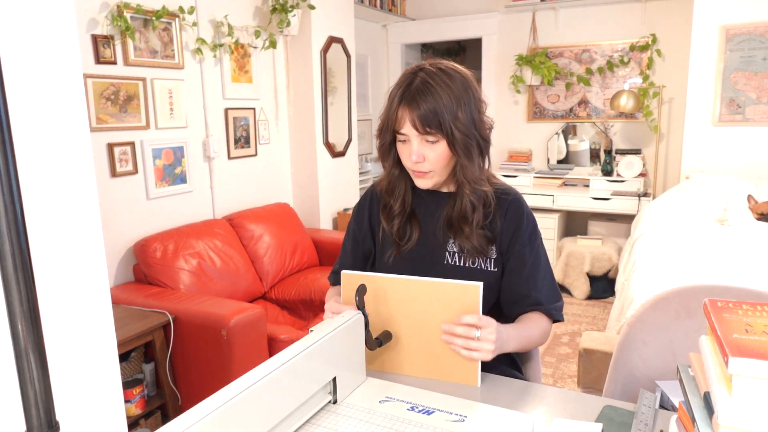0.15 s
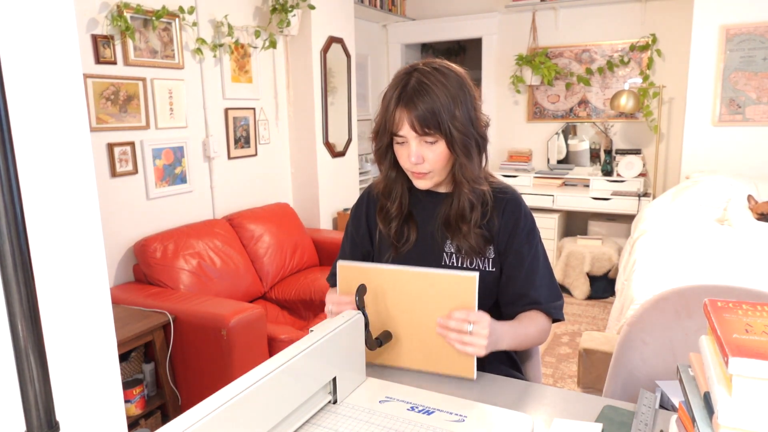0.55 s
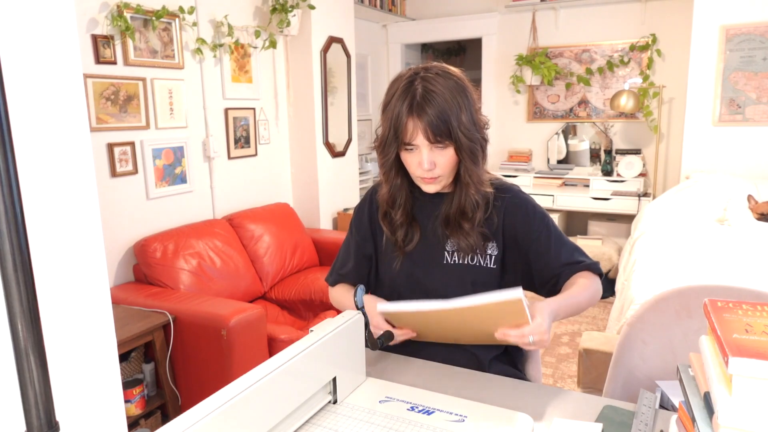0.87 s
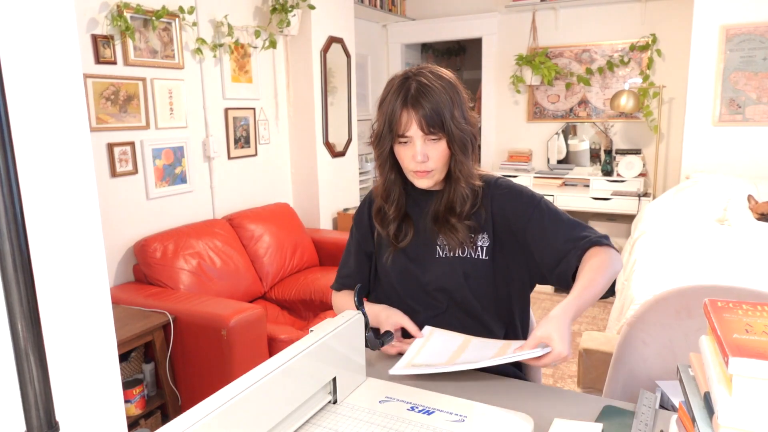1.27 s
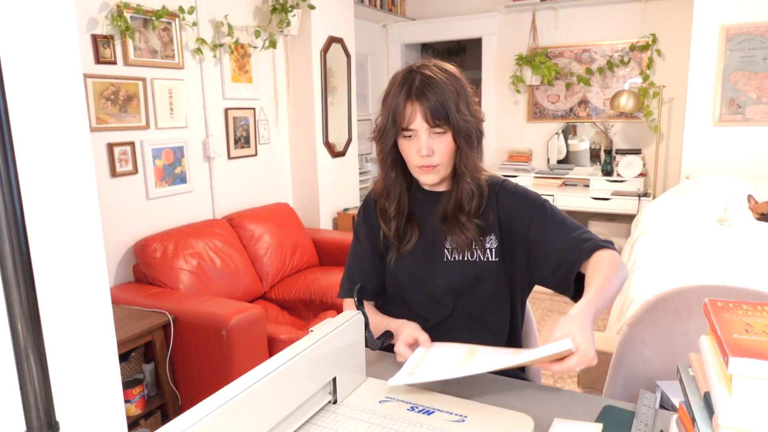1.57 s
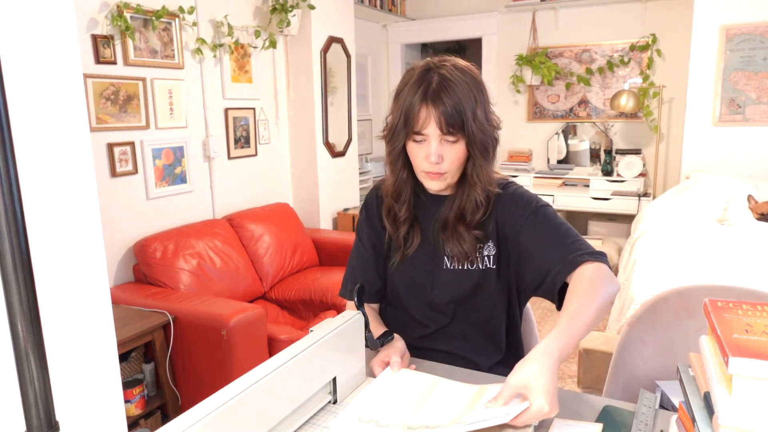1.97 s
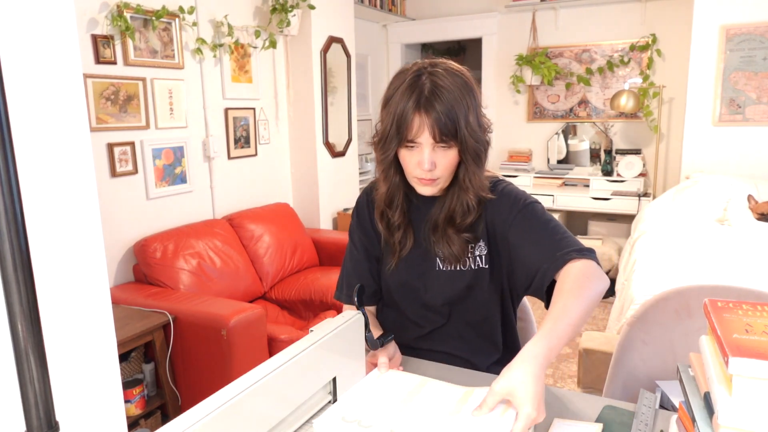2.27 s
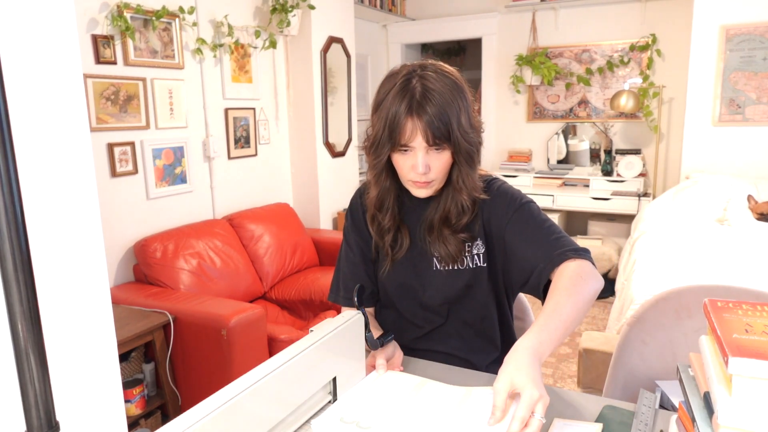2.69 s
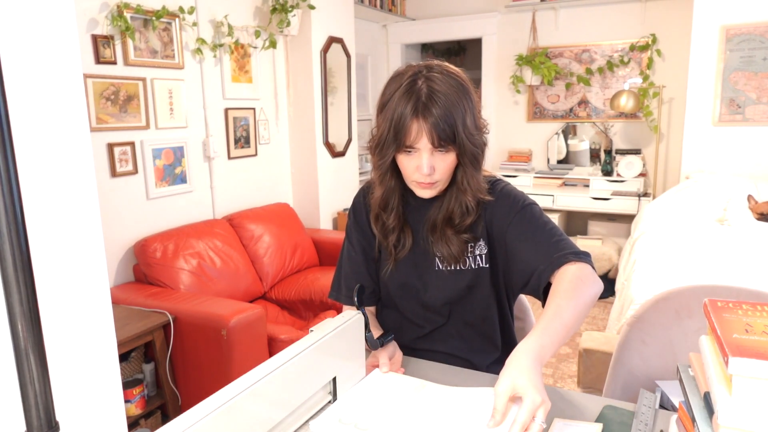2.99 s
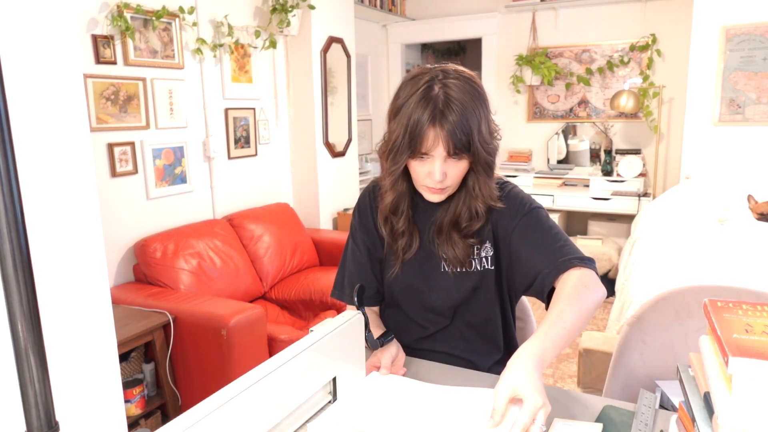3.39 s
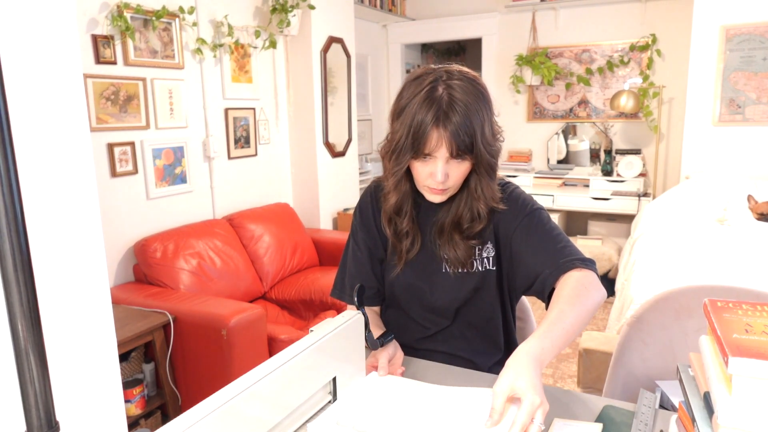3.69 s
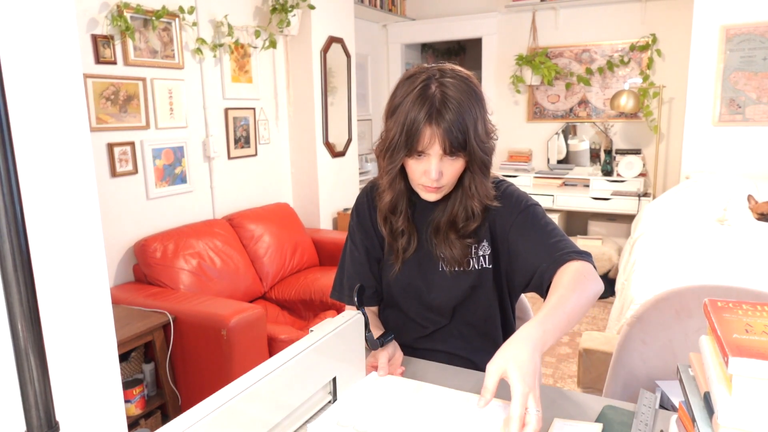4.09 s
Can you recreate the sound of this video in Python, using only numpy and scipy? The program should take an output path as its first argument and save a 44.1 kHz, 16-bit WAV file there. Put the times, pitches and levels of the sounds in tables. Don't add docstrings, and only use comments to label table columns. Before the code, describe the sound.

Close stereo sound in a small furnished room. A paper stack is knocked edge-first on a wooden desk, its loud first blow already ringing at the start, then a softer knock and another cut dead by an abrupt edit. Quiet sheet sliding follows, then a sharp plastic tap and a dull one as the stack lands in a tray, and a few faint nudges over low room hum.

```python
import sys
import numpy as np
from scipy import signal
from scipy.fft import rfft, irfft, next_fast_len
from scipy.io import wavfile
from scipy.ndimage import uniform_filter1d, map_coordinates

SR = 44100
rng = np.random.default_rng(int(sys.argv[2]) if len(sys.argv) > 2 else 0)


def generate_wav(sig):
    pcm = np.round(np.clip(np.atleast_2d(sig).T, -1, 1) * 32767).astype(np.int16)
    wavfile.write(sys.argv[1], SR, pcm)


def to_linear_factor(level_db):
    exponent = np.asarray(level_db, float) / 20
    return 10 ** exponent


N = 187199
LEAD = 22050
FIBRE_DB = 1.2
SWEEP_EDGE_DB = 18

# frequency in Hz, level in dB.
DRAG = [(100, -60), (500, -56), (850, -12.5), (1130, 1.5), (1350, -2), (1700, -18), (2500, -48),
        (6000, -60)]
# delay in seconds, level in dB.
NEAR_ECHOES = [(.0064, -5.5), (0.0135, -9)]


def knocks():
    # start in seconds, corner in dB, lag of the edge in seconds, edge in dB, desk in dB.
    blows = [
        (-.27, -5, 0.0087, 0, -16),
        (0.1911, -16, 0.0093, -11, -15),
        (.6606, -13, .006, -12.5, -15),
    ]
    # frequency in Hz, level in dB.
    corner = [(300, -7.5), (1500, -11), (3000, -11.5), (4500, 0.5), (6000, -7.5), (9000, -19.5),
              (15000, -39)]
    # frequency in Hz, level in dB.
    edge = [(60, -21), (300, -20), (600, 1.5), (950, 6), (1400, -1), (2000, -1), (3000, -4), (4200, -5.5),
            (7000, -8), (11000, -20.5), (15500, -32)]
    scene_change, fade = 0.6739, 0.0004
    out = np.zeros((2, LEAD + N))
    for start, corner_db, lag, edge_db, desk_db in blows:
        slap = to_linear_factor(corner_db) * burst(corner, t60=0.02, rise=0.00078)
        crack = to_linear_factor(edge_db) * burst(edge, t60=0.012, rise=0.00021)
        boom = to_linear_factor(desk_db - 5.5) * thud(rise=0.0041, low_hz=59.8, top_hz=2500)
        add(out, start, slap, wet_db=3.5, blur=160)
        add(out, start + lag, crack, wet_db=3, blur=160)
        add(out, start + lag, boom, wet_db=-3.0, blur=53)
    return placed(out) * np.clip((scene_change - np.arange(N) / SR) / fade, 0, 1)


def taps():
    # start in seconds, walls in dB, firmness in dB, floor in dB, click in dB.
    nudges = [
        (2.2269, -38, 1, -55, -48),
        (2.2331, -26, 5, -26, -13),
        (2.352, -30, -0.5, -33.5, -46),
        (2.8331, -48, 3, -42.5, -57),
        (3.0867, -40.5, -7.5, -45.5, -62),
        (3.4547, -41.5, 7.5, -35.5, -37),
        (3.9792, -40.5, -6.5, -54, -60),
        (4.164, -62, 0, -60, -75),
    ]
    # frequency in Hz, level in dB, 60 dB decay in seconds.
    tray = [
        [(924, -14, 0.26), (938, -1.5, 0.18)],
        [(1074, 3, 0.042), (1130.5, 6.5, 0.044), (1305, 4.5, 0.048), (1442, -3.5, 0.11)],
        [(1644, 3, 0.072), (1850, 3, 0.045), (2015, 2.5, 0.026), (2197, -1, 0.039)],
        [(584, -2, 0.27), (2955, -1, 0.095), (3374, 7, 0.05), (3720, -1, .03), (4200, 1.5, 0.033),
         (4900, -16, 0.017), (5170, -14, .03)],
    ]
    # frequency in Hz, level in dB.
    click = [(200, -13.5), (600, -15), (1000, 0.5), (1400, -16), (1800, -26), (2400, -2), (3300, 1),
             (4000, -4), (4800, 0), (5600, -10.5), (7000, -14), (11000, -29), (15500, -43)]
    # start in seconds, level in dB.
    thumps = [
        (2.244, -28.5),
        (2.369, -36.5),
        (3.099, -50.5),
        (3.25, -44.5),
        (3.465, -54),
        (3.988, -53),
    ]
    out = np.zeros((2, LEAD + N))
    t = np.arange(SR // 4) / SR
    for start, walls_db, firm_db, floor_db, click_db in nudges:
        rim_db = walls_db + firm_db
        frame_db = walls_db - 14 + 1.4 * firm_db
        ring = np.zeros(len(t))
        for family_db, modes in zip((floor_db, walls_db, rim_db, frame_db), tray):
            for hz, mode_db, t60 in modes:
                ring += to_linear_factor(family_db + mode_db - 60 * t / t60) * np.sin(2 * np.pi * hz * t)
        ring *= 1 - np.exp(-t / 0.00081)
        add(out, start, to_linear_factor(-3) * echoed(ring), wet_db=-4.0, blur=26)
        for lag, db in [(0, 0)] + NEAR_ECHOES:
            snap = to_linear_factor(click_db + db - 3) * burst(click, t60=0.03, rise=0.00016)
            add(out, start + lag, snap, wet_db=-1.5, blur=53)
    for start, db in thumps:
        thump = to_linear_factor(db + 0.5) * thud(rise=0.0032, low_hz=169, top_hz=300, damped=0.48)
        add(out, start, thump, wet_db=-5.5)
    return placed(out)


def thud(rise, low_hz, top_hz, damped=1):
    # frequency in Hz, level in dB, 60 dB decay in seconds.
    desk = [(147.5, 0.5, 0.19), (202, -8, 0.21), (265.7, -11, 0.54), (331.9, -1.5, 0.31), (383.6, -1, 0.23),
            (461.4, -6.5, 0.2), (497, -10.5, 0.39), (572, -4.5, 0.16), (628, -1.5, 0.19), (695, -7.5, 0.24),
            (794, -15, .15), (904, -4, 0.18), (1062, -8, 0.17), (1378, -5, 0.17)]
    t = np.arange(SR // 2) / SR
    boom = np.zeros(len(t))
    for hz, db, t60 in desk:
        reach = 1 / (1 + (hz / top_hz) ** 2) / (1 + (low_hz / hz) ** 4)
        decay = to_linear_factor(db - 60 * t / t60 / damped)
        boom += decay * reach * np.sin(2 * np.pi * hz * t + rng.uniform(0, 2 * np.pi))
    return boom * (1 - np.exp(-t / rise)) ** 2


def burst(spectrum, t60, rise):
    t = np.arange(SR // 4) / SR
    shape = to_linear_factor(-60 * t / t60) * (1 - np.exp(-t / rise))
    z = rfft(shape * rng.standard_normal(len(t)))
    even = z / np.sqrt(abs(uniform_filter1d(abs(z) ** 2, 160)) + 1e-20)
    colour = to_linear_factor(along(spectrum, np.fft.rfftfreq(len(t), 1 / SR)))
    puff = irfft(even * colour, len(t)) * (t < t[-1] / 2)
    return puff * np.linalg.norm(shape) / np.linalg.norm(puff)


def echoed(hit):
    return hit + sum(to_linear_factor(db) * np.roll(hit, round(delay * SR)) for delay, db in NEAR_ECHOES)


def sheets():
    # frequency in Hz, level in dB.
    scrape_colour = [(100, -62), (700, -9.5), (1500, -6), (2000, 0), (3200, -3), (5000, -3.5), (6500, -13),
                     (10000, -20.5)]
    # frequency in Hz, level in dB.
    hiss_colour = [(1500, -35), (4000, -0.5), (6000, -1.5), (9000, -2), (13000, -4), (16000, -2.5)]
    # start in seconds, peak in dB.
    ticks = [
        (0.595, -50),
        (1.082, -55),
        (1.4805, -48),
        (3.8194, -58),
        (3.8821, -51),
        (4.0633, -53),
    ]
    drag, scrape, hiss = strokes()
    grain = unit(to_linear_factor(FIBRE_DB * (wobble(45.9) + wobble(220))))
    rubbing = grain * (drag * pair(N, DRAG) + scrape * pair(N, scrape_colour))
    out = np.pad(rubbing, ((0, 0), (LEAD, 0)))
    for start, db in ticks:
        add(out, start, to_linear_factor(db + 1.5) * burst(scrape_colour, t60=0.0094, rise=0.0013), wet_db=-1.0)
    return out[:, LEAD:] + hiss * to_linear_factor(0.97 * wobble(52.9)) * pair(N, hiss_colour)


def strokes():
    # fastest moment in seconds, half length in seconds, tray drag in dB, scrape in dB, hiss in dB.
    sweeps = [(0.822, 0.14, -79, -75, -56), (1.175, 0.075, -83, -70, -65.5), (1.3, 0.082, -71.5, -76, -72),
              (1.42, 0.091, -70, -66, -64), (1.498, 0.052, -62, -64, -56.5), (1.58, 0.096, -76, -72, -68),
              (1.957, 0.087, -74, -69.5, -66.5), (2.068, .06, -67, -62.5, -79), (2.203, .16, -73, -57, -84),
              (2.41, 0.16, -90, -88, -56), (3.63, .08, -73, -75, -92), (3.902, 0.08, -76, -60, -63.5),
              (3.992, 0.11, -68, -65.5, -71)]
    # time to lose 20 dB in seconds, tray drag in dB, scrape in dB, hiss in dB.
    catches = [
        (.2, -89, -70, -75),
        (0.16, -76, -63, -68),
        (0.19, -52.5, -54.5, -68),
        (-0.05, -78, -71, -80),
    ]
    catch_starts = [.7, 1.074, 1.783, 3.825]
    rise, hold = 0.15, 0.5
    t = np.arange(N) / SR
    shapes = [to_linear_factor(-SWEEP_EDGE_DB * ((t - s) / half) ** 2) for s, half, *_ in sweeps]
    for start, (fall, *_) in zip(catch_starts, catches):
        grip = np.clip((t - start) / (rise * fall), 0, 1)
        shapes.append(grip * to_linear_factor(-20 * np.clip((t - start) / fall - hold, 0, None)))
    levels_db = np.array([row[-3:] for row in sweeps + catches]).T
    return np.sqrt(to_linear_factor(levels_db) ** 2 @ np.square(shapes))


def rim_rub():
    # fastest moment in seconds, half length in seconds, level in dB.
    rub = (2.19, 0.086, -63)
    fastest, half, db = rub
    t = np.arange(N) / SR
    sweep = to_linear_factor(db - SWEEP_EDGE_DB * ((t - fastest) / half) ** 2 + FIBRE_DB * wobble(60.3))
    return sweep * pair(N, [(hz * 1.55, level) for hz, level in DRAG])


def room_tone():
    # frequency in Hz, level in dB per Hz.
    air_colour = [(18, -70), (30, -43), (64, -25), (118, -7.5), (134, -7.5), (199, 1), (295, -3), (486, -9),
                  (937, -11.5), (1220, -12), (2170, -16), (2750, -17), (5500, -23.5), (16000, -30.5)]
    air = pair(N, air_colour)
    low = filtered(air, lambda hz: 1 / (1 + (hz / 420) ** 4))
    lumps = to_linear_factor(1.5 * wobble(3.57) + 0.39 * wobble(9.5))
    return to_linear_factor(-60) * (air - low + low * lumps)


def add(out, s, hit, wet_db, blur=0):
    # frequency in Hz, likeness from 0 to 1.
    echo_alike = [(100, 0.98), (300, 0.97), (600, 0.89), (2000, 0.82), (8000, 0.47), (15000, 0.84)]
    # frequency in Hz, 60 dB decay in seconds.
    room = [(100, 0.64), (350, 0.39), (1000, 0.4), (3000, 0.4), (6000, 0.34), (12000, 0.4)]
    hz, t, z = signal.stft(pair(SR // 2, alike=echo_alike), SR, nperseg=256)
    decay = to_linear_factor(-60 * t / along(room, hz)[:, None])
    tail = signal.istft(z * decay, SR, nperseg=256)[1]
    tail = tail * (1 - np.exp(-np.arange(tail.shape[1]) / SR / 0.005))
    sent = hit
    if blur:
        colour = np.sqrt(abs(uniform_filter1d(abs(rfft(hit)) ** 2, blur)))
        sent = np.roll(irfft(colour, len(hit)), 128)[:256] * np.hanning(256)
    heard = to_linear_factor(wet_db) * signal.fftconvolve(sent[None], tail / np.linalg.norm(tail[0]), axes=1)
    heard[:, :len(hit)] += hit
    spot = out[:, LEAD + round(s * SR):][:, :heard.shape[1]]
    spot += heard[:, :spot.shape[1]]


def placed(x):
    # frequency in Hz, dB taken from the left and given to the right.
    rightward = [(300, 0.05), (600, 0.7), (5000, 0.97), (12000, 0.7)]

    def response(hz):
        bass_loss = (1j * hz / (1j * hz + 110)) ** 2
        return bass_loss * to_linear_factor(along(rightward, hz) * [[-1], [1]])
    return filtered(x, response)[:, LEAD:]


def pair(size, spectrum=((1, 0),), alike=None):
    # frequency in Hz, likeness from 0 to 1.
    usual_alike = [(100, 0.51), (300, 0.58), (600, 0.45), (2000, 0.65), (8000, 0.72), (15000, 0.91)]
    likeness = usual_alike if alike is None else alike

    def shape(hz):
        turn = np.arccos(np.clip(along(likeness, hz), 0, 1)) / 2
        return to_linear_factor(along(spectrum, hz)) * [np.cos(turn), np.sin(turn)]
    mid, side = filtered(rng.standard_normal((2, size)), shape)
    return unit(np.array([mid + side, mid - side]))


def wobble(rate):
    knots = rng.standard_normal(int(N * rate / SR) + 4)
    return map_coordinates(knots, [np.arange(N) * rate / SR])


def filtered(x, response):
    m = next_fast_len(x.shape[-1] + 8192)
    return irfft(rfft(x, m) * response(np.fft.rfftfreq(m, 1 / SR)), m)[..., :x.shape[-1]]


def along(points, hz):
    f, v = np.transpose(points)
    return np.interp(np.log(hz + 1), np.log(f + 1), v)


def unit(x):
    return x / np.sqrt(np.mean(x ** 2) + 1e-20)


def scene():
    paper = sheets() * to_linear_factor([[-0.5], [0.5]])
    air = room_tone() * to_linear_factor([[-0.3], [0.3]])
    return knocks() + taps() + paper + rim_rub() + air


def top_cut(x):
    return signal.sosfilt(signal.butter(12, 16670, fs=SR, output="sos"), x)


def record(dry):
    kept = filtered(dry, lambda hz: np.where(hz < 15830, 1, 0.02))
    return top_cut(kept)


dry = scene()
out = record(dry)
generate_wav(out)
```